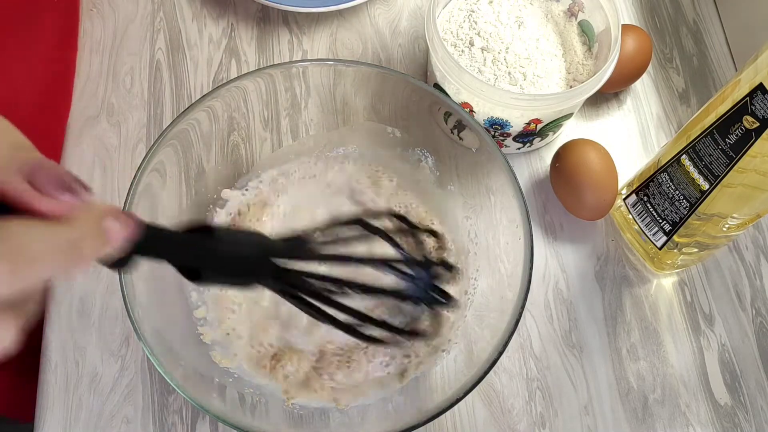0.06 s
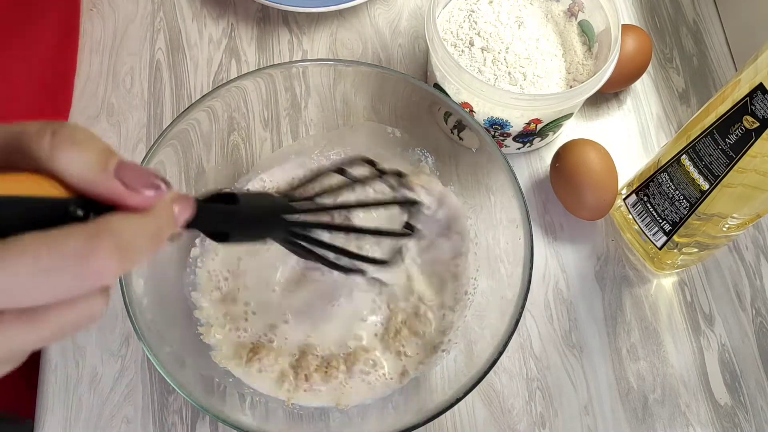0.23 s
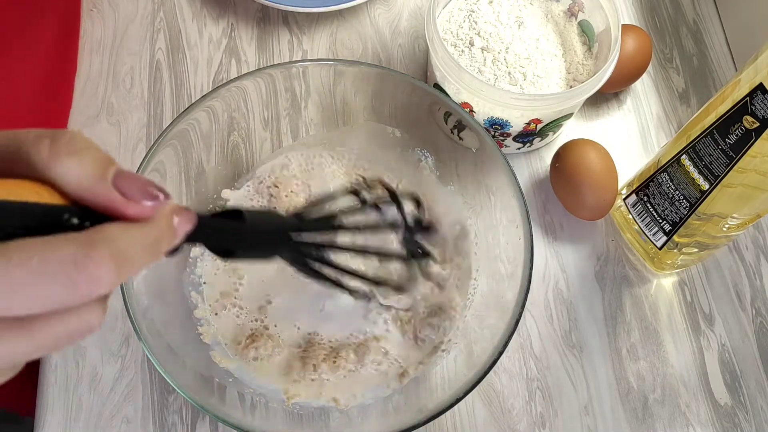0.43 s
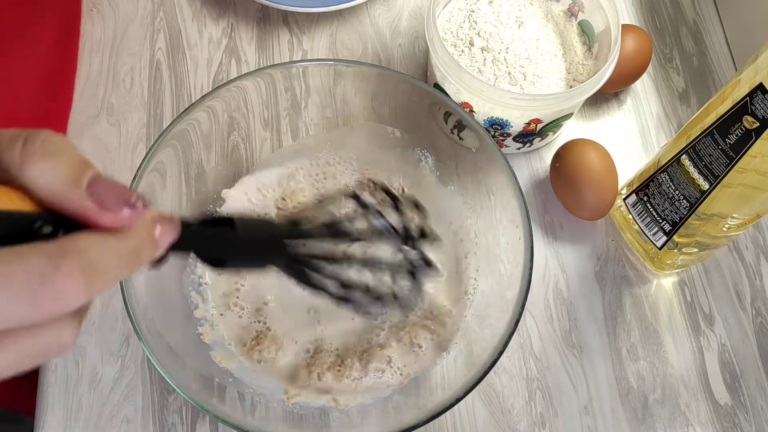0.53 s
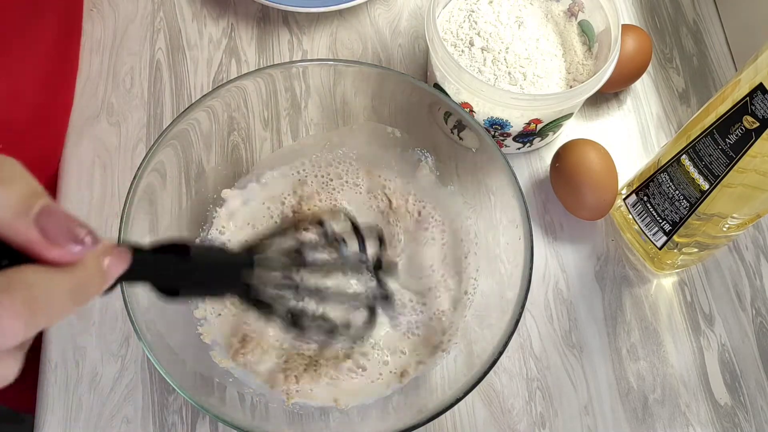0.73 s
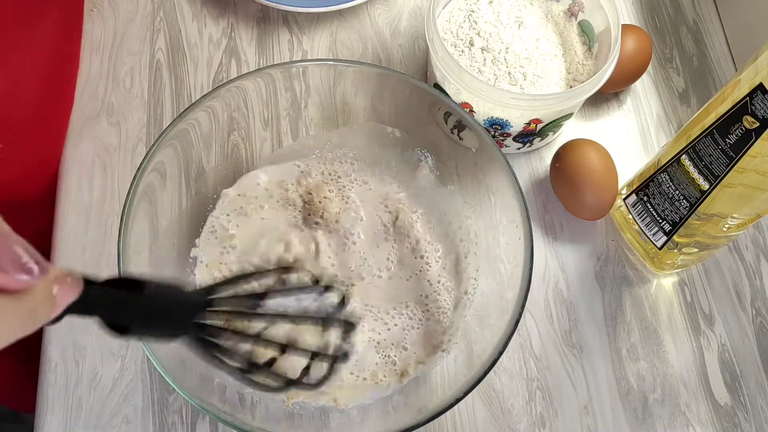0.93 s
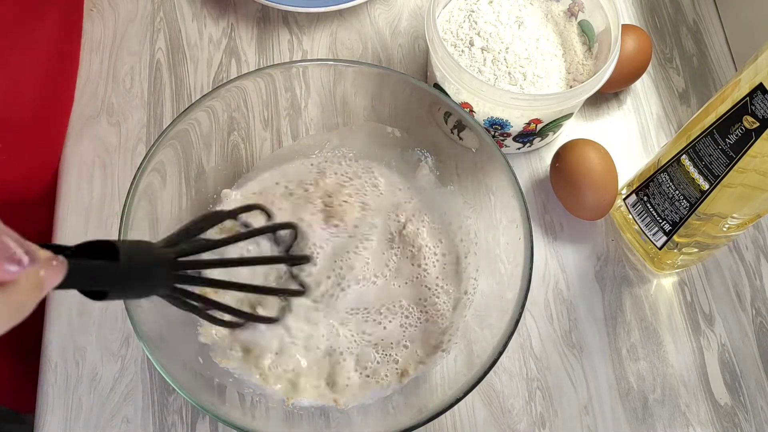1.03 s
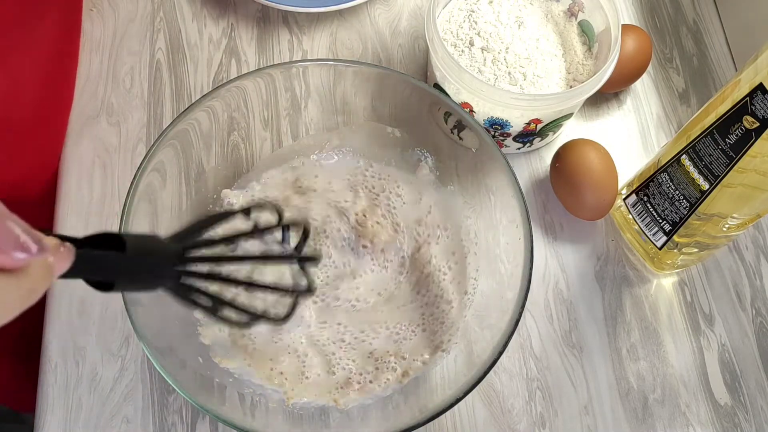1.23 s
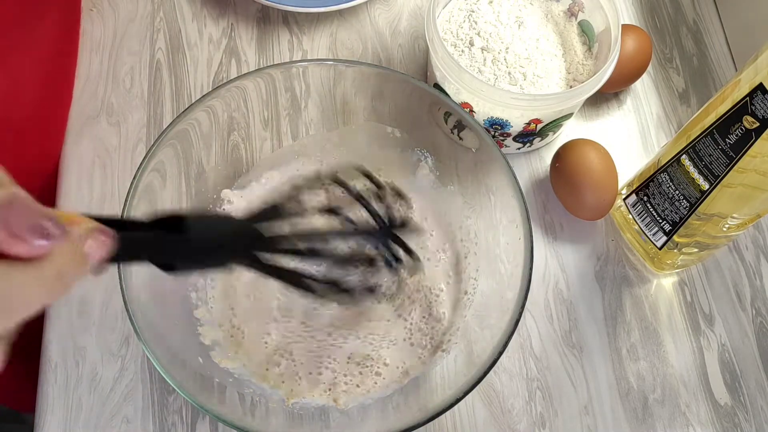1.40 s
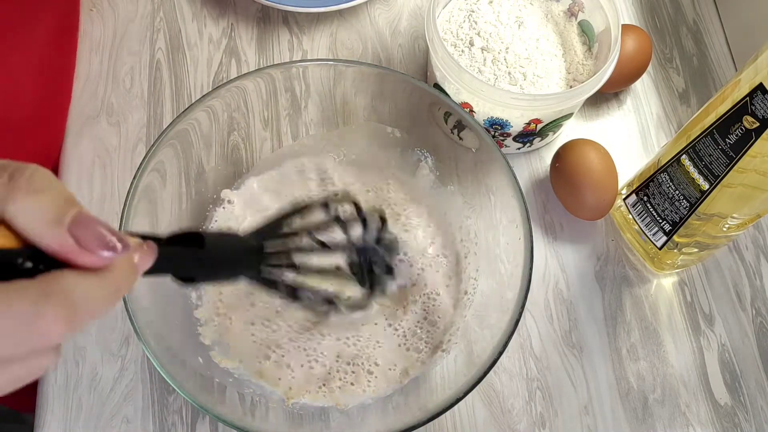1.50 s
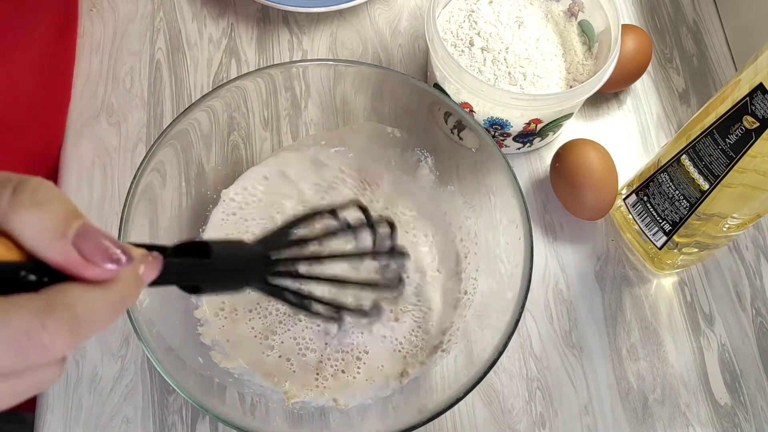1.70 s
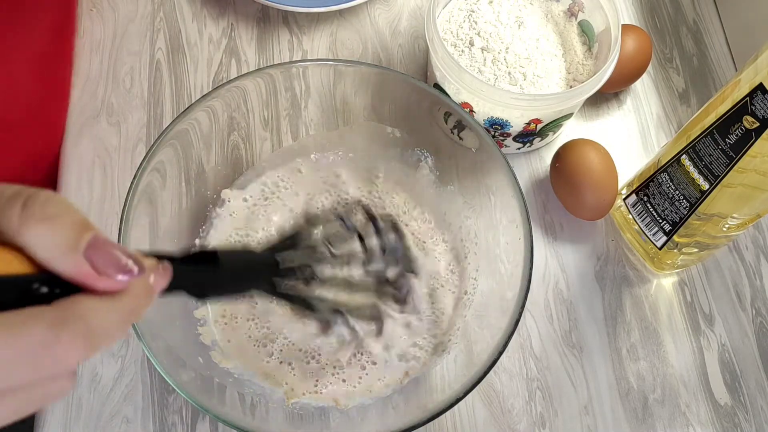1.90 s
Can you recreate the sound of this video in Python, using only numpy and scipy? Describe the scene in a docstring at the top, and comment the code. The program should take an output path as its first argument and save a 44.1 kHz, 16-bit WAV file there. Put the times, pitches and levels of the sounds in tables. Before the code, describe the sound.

Quick sharp whisk clacks in a glass bowl, with small wet plops and fizzing froth.

```python
"""Sharp clacks, about six a second: a wire whisk swung round in thin batter in a glass bowl.
On each turn the wires strike the glass, and bowl and kitchen table answer with a thump and a short ring.
Between the clacks single wires tick, air pockets plop, films of batter snap and the froth crackles.
Heard from close by on a stereo pair of microphones, in a small kitchen with a low rumble."""
import sys
import numpy as np
from scipy import signal
from scipy.fft import rfft, irfft
from scipy.io import wavfile

SR = 44100
rng = np.random.default_rng(int(sys.argv[2]) if len(sys.argv) > 2 else 0)


def inscribe(sig):
    """Save sig as 16-bit PCM at rate SR to the path in sys.argv[1].

    A 1-D sig is mono; a 2-D sig holds one channel per row.
    Samples are clipped to [-1, 1] before scaling.
    """
    pcm = np.round(np.clip(np.atleast_2d(sig).T, -1, 1) * 32767)
    wavfile.write(sys.argv[1], SR, pcm.astype(np.int16))


N = 85995
SHOT = 16384  # samples given to one short sound
TIME, AGE = np.arange(N) / SR, np.arange(SHOT) / SR  # seconds into the scene, into one short sound
SCENE_HZ, SHOT_HZ = np.fft.rfftfreq(N, 1 / SR), np.fft.rfftfreq(SHOT, 1 / SR)

# The whisk hits the bowl. Each row: start in seconds, thump gain in dB at 120, 230 and 400 Hz,
# glass ring gain in dB, wire pitch in Hz, attack and chatter decay in seconds,
# clack gain in dB at 1.2, 2, 3.5, 8 and 13 kHz.
STROKES = [(0.2121, -7, -3.5, -6, -9.5, 3460, 0.00039, 0.0014, -6, -1, -5, -14.5, -17),
           (0.4420, -7, 0.5, -1.5, -0.5, 4000, 0.00064, 0.002, -3, -1, -8, -2, -5),
           (0.6306, -1.5, 5, -3.5, -1, 3490, 0.0014, 0.0024, -0.5, -4.5, -1, -1, -2.5),
           (0.8039, -9, 7, -6.5, 0, 3320, 0.00059, 0.0027, -1.5, -1.5, -5, -9, -3),
           (0.9728, 0.5, -4, 1.5, -1.5, 3680, 0.00036, 0.0029, -3.5, -1, -2, 4.5, 4),
           (1.1224, 2, -14, 4.5, -0.5, 3290, 0.00297, 0.0037, 1, -2.5, -1.5, 9.5, 7.5),
           (1.2839, -7.5, -7.5, -3.5, -6.5, 3770, 0.00068, 0.0018, -6, -5.5, 0, 3.5, -6.5),
           (1.5204, -6, -6, -7.5, -9, 3500, 0.0017, 0.0022, -3, -3, -8, -3.5, -3)]


def from_db(db):
    """Decibels to gain."""
    return 10 ** (np.asarray(db) / 20)


def rms_one(x):
    """Scale to unit power."""
    return x / np.sqrt(np.mean(x ** 2) + 1e-20)


def at_hz(points, hz):
    """Read rows of frequency and value on a log-frequency axis."""
    frequencies, values = np.transpose(points)
    return np.interp(np.log(np.maximum(hz, 1)), np.log(frequencies), values)


def pan(db):
    """Left and right gains for a level difference, left minus right."""
    return from_db(np.array([[db], [-db]]) / 2)


def add(out, start_s, sound):
    """Mix a stereo sound in at a time."""
    i = int(start_s * SR)
    out[:, i:i + sound.shape[1]] += sound[:, :max(N - i, 0)]


def swell(rise_s, power=2):
    """Smooth onset from 0 to 1."""
    return 1 - np.exp(-(AGE / rise_s) ** power)


def fade(t60):
    """Decay that loses 60 dB in t60 seconds."""
    return from_db(-60 * AGE / t60)


def noise(gain, likeness, size):
    """Stereo noise with a gain per frequency; at likeness 1 both sides are the same."""
    mid, side = irfft(rfft(rng.standard_normal((2, size))) * gain, size)
    return (np.sqrt(1 + likeness) * mid + np.sqrt(1 - likeness) * side * [[1], [-1]]) / np.sqrt(2)


def burst(gain, likeness, envelope):
    """Noise under an envelope, with a total energy that does not depend on chance."""
    x = noise(gain, likeness, SHOT) * envelope
    return rms_one(x) * np.sqrt(np.mean(gain ** 2) * np.mean(envelope ** 2))


def ring(modes, scatter_db):
    """Damped sines of alternating sign, each with a new strength on every blow."""
    out = 0
    for k, (hz, db, t60, pan_db) in enumerate(modes):
        strength = (-1) ** k * from_db(db + scatter_db * rng.normal())
        out = out + pan(pan_db) * strength * fade(t60) * np.sin(2 * np.pi * hz * AGE)
    return out


def hump(centre_hz, width):
    """A bell-shaped resonance curve, with a width in log frequency."""
    return np.exp(-(np.log((SHOT_HZ + 1) / centre_hz) / width) ** 2)


def resonate(x, hz, width):
    """Band-pass round a pitch, with a width in log frequency; unit power."""
    edges = np.clip(hz * np.exp([-width, width]), 20, .45 * SR)
    return rms_one(signal.sosfilt(signal.butter(2, edges, "band", fs=SR, output="sos"), x + 1e-18))


def rumble():
    """The kitchen's low steady background, a little stronger on the left microphone."""
    # Rumble spectrum. Each row: frequency in Hz, relative level in dB.
    spectrum = [(20, 1), (40, -8.5), (80, -2.5), (130, 0), (200, -9.5), (300, -10), (500, -17),
                (800, -24.5), (2000, -50.5), (8000, -37.5)]
    hum = noise(from_db(at_hz(spectrum, SCENE_HZ)), likeness=.92, size=N)
    return from_db(-49) * pan(db=3) * rms_one(hum)


def echoes(x):
    """Surfaces near the bowl throw the first reflections back to the microphones."""
    # Reflections. Each row: left delay and right delay in seconds, gain in dB.
    reflections = [(.0031, .0024, -7.5), (.0083, .0086, -10)]
    out = np.zeros((2, N))
    for *lags, db in reflections:
        for side, lag in enumerate(lags):
            out[side] += from_db(db) * np.interp(TIME - lag, TIME, x[side], left=0)
    return out


def room(x):
    """The kitchen's diffuse tail dies band by band, alike at both microphones only in the bass."""
    # Colour of the tail. Each row: frequency in Hz, gain in dB.
    colour = [(100, 9), (250, -10), (500, -5.5), (1000, 2), (3000, -5.5), (8000, -9.5), (15000, -4)]
    # Reverberation time. Each row: frequency in Hz, seconds to fall 60 dB.
    decay_times = [(100, 0.18), (400, 0.3), (1000, 0.14), (3000, 0.2), (8000, 0.19), (15000, 0.11)]
    edges = np.geomspace(70, 17000, 11)
    tail = 0
    for low, high in zip(edges, edges[1:]):
        centre = np.sqrt(low * high)
        envelope = swell(rise_s=.0049, power=4) * fade(at_hz(decay_times, centre))
        gain = (SHOT_HZ >= low) * (SHOT_HZ < high) * from_db(at_hz(colour, centre))
        likeness = 1 / (1 + (centre / 600) ** 4)
        tail = tail + burst(gain, likeness, envelope) / np.sqrt(np.sum(envelope ** 2))
    return signal.fftconvolve(x, tail, axes=1)[:, :N]


def froth():
    """Tiny bubbles in the stirred froth burst at random over a fine fizz."""
    # Loudness of the froth. Each row: time in seconds, level in dB.
    loudness = [(0, -52.5), (.12, -57), (.2, -47), (.38, -52), (.55, -52.5), (.9, -51.5), (1.08, -46),
                (1.25, -52.5), (1.45, -53.5), (1.65, -50.5), (1.95, -50.5)]
    # Colour of bubbles and fizz. Each row: frequency in Hz, relative level in dB.
    spectrum = [(300, 1), (700, -3.5), (1200, -1), (2000, -0.5), (3200, -3.5), (5000, -1.5), (7000, -5.5),
                (8600, 1), (10500, -15), (15500, -17.5)]
    bursts_per_s, spread_db, ring_cycles = 600, 5.5, 10.5
    crackle, pitches = np.zeros((2, N)), np.geomspace(800, 12000, 24)
    for hz in pitches:
        bursting = rng.random(N) < bursts_per_s / len(pitches) / SR
        strength = from_db(spread_db * np.minimum(rng.exponential(1, N), 2.5))
        clicks = bursting * strength * rng.choice([-1, 1], N)
        stereo_clicks = clicks * (1 + .5 * rng.standard_normal((2, N)))
        # Each click rings a resonator that falls 60 dB in ring_cycles periods.
        w, r = 2 * np.pi * hz / SR, from_db(-60 * hz / (ring_cycles * SR))
        pings = signal.lfilter([0, np.sin(w)], [1, -2 * r * np.cos(w), r * r], stereo_clicks + 1e-18)
        crackle += from_db(at_hz(spectrum, hz)) * w * pings
    fizz = noise(from_db(at_hz(spectrum, SCENE_HZ)), likeness=.05, size=N)
    level = from_db(np.interp(TIME, *np.transpose(loudness)))
    return level * (from_db(-8) * rms_one(crackle) + from_db(-3.5) * rms_one(fizz))


def plops():
    """Air trapped in the batter swells into a short note that rises a little."""
    # Air pockets. Each row: start in seconds, level in dB, pitch in Hz, swell in seconds,
    # seconds to fall 60 dB, left minus right in dB.
    air_pockets = [(.262, -35.5, 795, 0.0014, 0.066, 13.5), (0.552, -36, 997, .001, 0.027, 4),
                   (.637, -8, 821.5, 0.012, .05, 7.5), (0.806, -26, 1424, 0.0013, 0.1, 7.5),
                   (0.927, -36.5, 1420, 0.00078, .018, 0), (1.029, -41, 900, 0.0015, 0.023, 15),
                   (1.082, -38, 1280, 0.0022, 0.047, 1), (1.127, -18.5, 1267, 0.0016, 0.036, -3),
                   (1.5762, -19, 849, 0.0018, .02, 7.5), (1.602, -28, 830, 0.0053, 0.042, 12.5),
                   (1.638, -36, 1140, 0.0013, 0.02, 0), (1.663, -38, 1377, 0.0028, 0.031, 5),
                   (1.708, -32.5, 1290, 0.00074, 0.013, 0)]
    rise_per_s = .25  # as a share of the starting pitch
    out = np.zeros((2, N))
    for start_s, db, hz, swell_s, t60, pan_db in air_pockets:
        note = np.sin(2 * np.pi * hz * AGE * (1 + rise_per_s * AGE / 2))
        add(out, start_s, pan(pan_db) * from_db(db) * swell(swell_s) * fade(t60) * note)
    return out


def snaps():
    """A film of batter snaps between the wires: a sharp pop with a trace of spray."""
    # Snapping films. Each row: start in seconds, level in dB, pitch in Hz, seconds to fall 60 dB,
    # upper partial and spray in relative dB.
    films = [(.2596, -4, 3250, .005, -1, -24), (1.8715, -26, 3280, .014, -18, -24)]
    upper_ratio, spray_s = 2.38, .0026
    out = np.zeros((2, N))
    for start_s, db, hz, t60, upper_db, spray_db in films:
        pop = ring([(hz, 0, t60, 0), (hz * upper_ratio, upper_db, t60 * .54, 0)], scatter_db=.5)
        spray = from_db(spray_db) * noise(1, likeness=1, size=SHOT) * np.exp(-AGE / spray_s)
        add(out, start_s, from_db(db) * swell(rise_s=.00044) * (pop + spray))
    return out


def ticks():
    """Single wires touch the glass or each other, each a tiny scrape that rings two resonances."""
    # Light contacts. Each row: start in seconds, level in dB, pitch in Hz, decay in seconds,
    # upper resonance in relative dB.
    contacts = [(.1585, -34, 4300, 0.0022, -10.5), (0.164, -32.5, 3280, .001, -34),
                (0.2427, -27.5, 2820, 0.0066, -18), (0.251, -30, 3060, 0.0072, -11),
                (0.412, -42.5, 4800, 0.0071, -16), (.5535, -41, 3100, 0.0025, -17),
                (.7220, -45, 4700, .002, -9), (.7575, -64, 4000, 0.00057, -10),
                (0.9292, -44, 3220, 0.0053, -19), (1.0870, -37.5, 3160, 0.0043, -26),
                (1.1570, -30, 2740, 0.0032, -34), (1.3657, -37, 6260, 0.0019, -12),
                (1.4501, -43, 3600, 0.00092, 0.5), (1.479, -40, 4500, 0.0068, -9),
                (1.637, -38.5, 2950, 0.0018, -7), (1.714, -38.5, 3670, 0.0022, -17),
                (1.762, -38.5, 3300, 0.0019, -11), (1.7905, -54.5, 4000, 0.0011, 13.5),
                (1.8100, -45, 2940, 0.0026, -3), (1.858, -41, 3020, 0.0013, -12),
                (1.939, -41.5, 2750, 0.004, -16)]
    out = np.zeros((2, N))
    for start_s, db, hz, decay_s, upper_db in contacts:
        envelope = np.exp(-AGE / decay_s)
        scrape = noise(1, likeness=1, size=SHOT) * envelope
        lower = resonate(scrape, hz, width=.22)
        upper = from_db(upper_db) * resonate(scrape, hz=7850, width=.037)
        tick = lower + upper + from_db(-12) * rms_one(scrape)
        add(out, start_s, from_db(db) * np.sqrt(np.mean(envelope ** 2)) * tick)
    return out


def thumps():
    """Each stroke pushes the bowl softly against the table; where it lands decides which modes answer."""
    # Low modes of the bowl on the table. Each row: frequency in Hz, level in dB, seconds to fall 60 dB.
    bowl_modes = [(119, -33, 0.11), (136.6, -34.5, 0.14), (151.9, -39.5, 0.29), (218, -33, .13),
                  (272.5, -37.5, 0.087), (300, -35, 0.072), (378.2, -37, 0.38), (426, -33, 0.065),
                  (458, -40.5, 0.1), (507, -40.5, 0.19)]
    late_s, push_s, pan_db, low_cut_hz = .0012, .00052, 1.5, 83
    out = np.zeros((2, N))
    for start_s, low_db, middle_db, high_db, *_ in STROKES:
        colour = [(120, low_db), (230, middle_db), (400, high_db)]
        modes = [(hz, db + at_hz(colour, hz), t60, pan_db) for hz, db, t60 in bowl_modes]
        add(out, start_s + late_s, -ring(modes, scatter_db=1.2))
    pole = np.exp(-2 * np.pi / (push_s * SR))  # the soft push acts as a low-pass
    softened = signal.lfilter([1 - pole], [1, -pole], out)
    return signal.sosfilt(signal.butter(4, low_cut_hz, "high", fs=SR, output="sos"), softened)


def clacks():
    """The wires land on the glass within a few milliseconds and shiver on; the glass rings briefly."""
    # Clack of the wires. Each row: frequency in Hz, relative level in dB.
    spectrum = [(300, 4.5), (650, -12.5), (1000, -1.5), (1400, -3), (1750, -6.5), (2200, -2), (2600, -2.5),
                (3500, -3), (4800, -3.5), (5400, -2), (6300, -4), (7200, -8.5), (8700, -5.5),
                (10500, -19.5), (15500, -20.5)]
    # Modes of the glass, damped by batter. Each row: frequency in Hz, level in dB,
    # seconds to fall 60 dB, left minus right in dB.
    glass_modes = [(830.5, -39.5, .16, 5.5), (927, -44, 0.048, 24), (1156, -41.5, 0.042, -15),
                   (1287, -34, 0.069, 8), (1450, -41, 0.1, 3.5), (2065, -41, 0.13, -5),
                   (2984, -45.5, 0.043, -24), (3710, -48, 0.1, -23), (3840, -42, .12, -5),
                   (4744, -42, 0.1, 16), (5430, -64, 0.063, -7), (8390, -44, 0.067, -10)]
    trim_db, shiver_db, shiver_s = -7, -15.5, .011
    out = np.zeros((2, N))
    for start_s, _, _, _, ring_db, wire_hz, attack_s, chatter_s, *colour_db in STROKES:
        # The striking wire has two resonances.
        wire_db = 8 * hump(wire_hz, width=.11) + 3.5 * hump(wire_hz * 2.21, width=.11)
        colour = list(zip((1200, 2000, 3500, 8000, 13000), colour_db))
        gain = from_db(trim_db + at_hz(spectrum, SHOT_HZ) + wire_db + at_hz(colour, SHOT_HZ))
        chatter = np.exp(-AGE / chatter_s)
        shiver = from_db(shiver_db) * np.exp(-AGE / shiver_s)
        add(out, start_s, burst(gain, likeness=.28, envelope=swell(attack_s) * (chatter + shiver)))
        add(out, start_s + attack_s, from_db(ring_db) * ring(glass_modes, scatter_db=6))
    return out


def scene():
    """The bowl in the kitchen; all its direct sound but the snaps reaches the left microphone first."""
    right_lag_s = .00011
    bright = clacks() + ticks() + froth()
    batter, pops, knock = plops(), snaps(), thumps()
    left, right = bright + knock + batter
    direct = np.array([left, np.interp(TIME - right_lag_s, TIME, right)]) + pops
    into_room = bright + from_db(-6) * knock + from_db(-3.5) * batter + from_db(-5.5) * pops
    return direct + echoes(bright) + room(into_room) + rumble()


def record(dry):
    """The treble is cut steeply above 16.2 kHz."""
    return signal.sosfilt(signal.ellip(10, .1, 80, 16200, fs=SR, output="sos"), dry)


dry = scene()
out = record(dry)
inscribe(out)
```